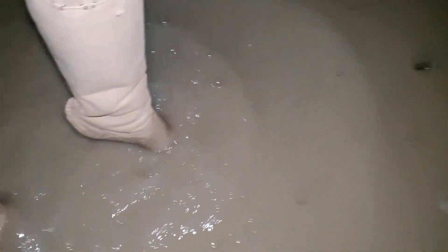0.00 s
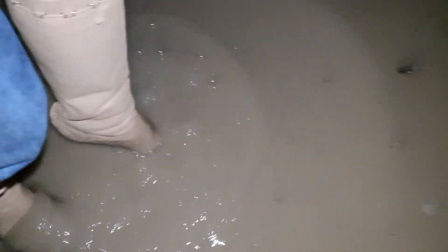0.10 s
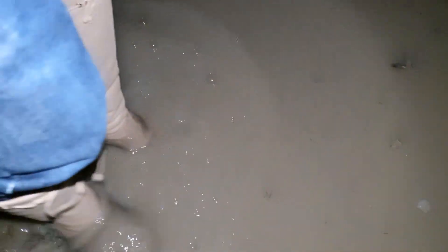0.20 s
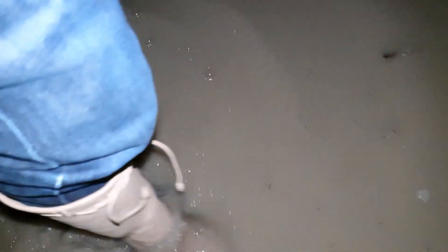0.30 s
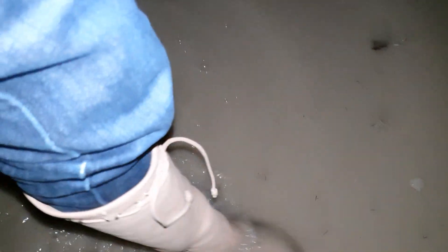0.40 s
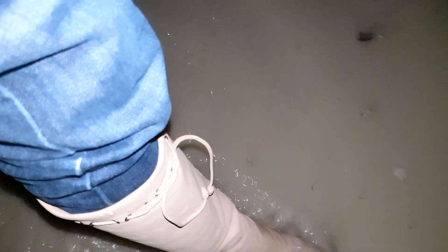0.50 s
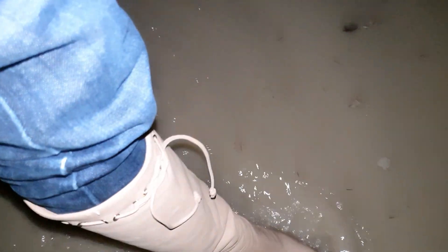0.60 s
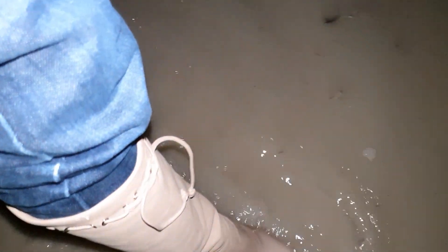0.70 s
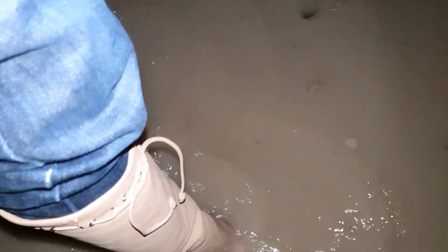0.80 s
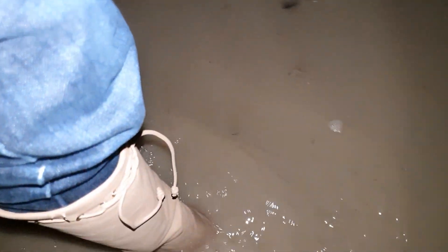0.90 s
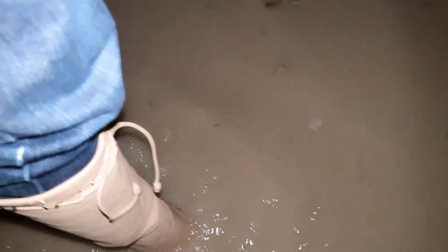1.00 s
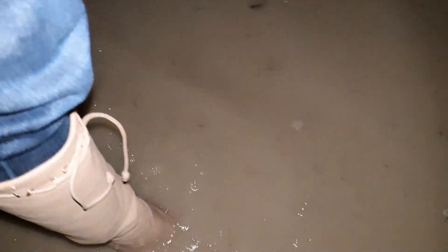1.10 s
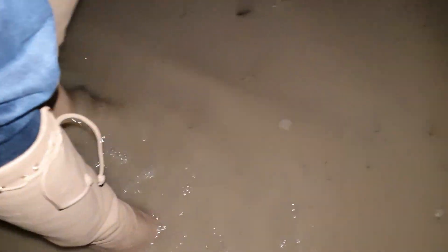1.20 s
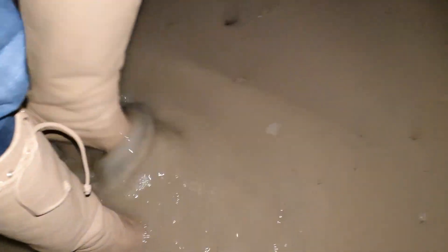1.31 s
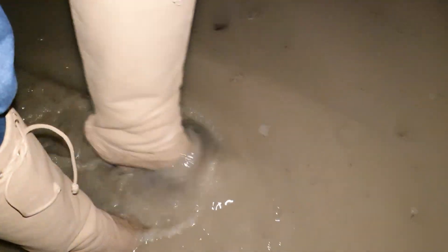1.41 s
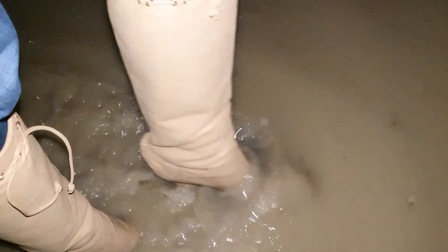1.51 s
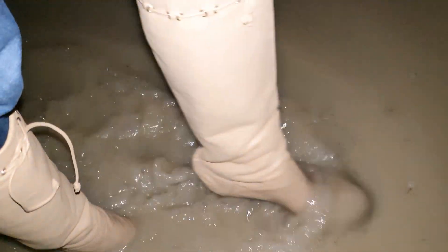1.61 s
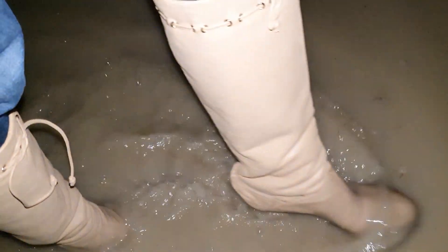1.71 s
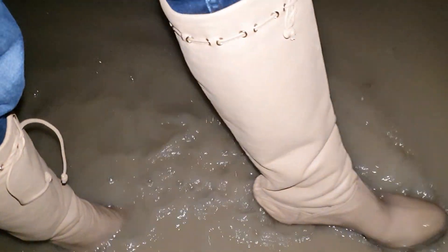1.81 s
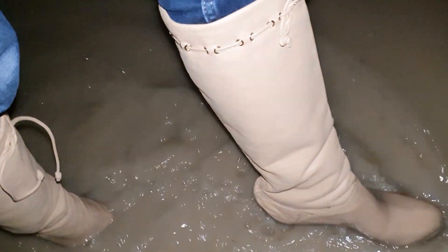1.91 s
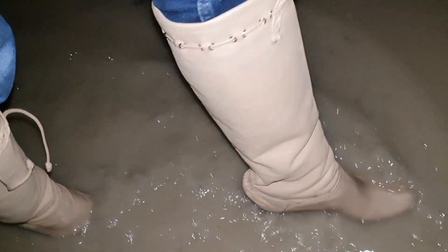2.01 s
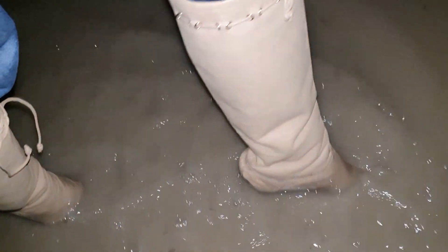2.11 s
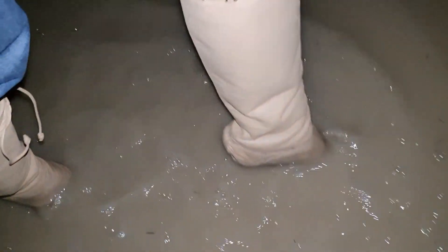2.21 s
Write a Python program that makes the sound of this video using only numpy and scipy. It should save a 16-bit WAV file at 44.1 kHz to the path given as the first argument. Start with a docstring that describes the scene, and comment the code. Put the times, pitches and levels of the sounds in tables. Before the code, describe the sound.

Two slow boot strides slosh through a shallow muddy puddle, the first louder with plops and a quick run of glugs, then drips, a calmer gap, and a softer second slosh; quiet outdoors, close stereo microphone.

```python
"""A shallow muddy puddle outdoors at night: two slow boot strides, heard from close above.
Trapped air rings as short damped sines, mostly gliding up in pitch: the loudest are listed, and a random
swarm of small bubbles follows the stirring. Drops slap the surface as noise cracks over a low push; spray is
flickering treble noise. Shaped noise makes the faint hiss, the swelling low rumble and a late rustle."""
import sys
import numpy as np
from scipy import signal
from scipy.io import wavfile
from scipy.ndimage import uniform_filter1d

SR = 44100
rng = np.random.default_rng(int(sys.argv[2]) if len(sys.argv) > 2 else 0)


def put_to_file(sound):
    """Save the sound as 16-bit audio at rate SR, in the file named by the first command-line argument."""
    columns = np.atleast_2d(sound).T  # one column per channel
    safe = np.clip(columns, -1, 1)
    whole_steps = np.round(safe * 32767)
    wavfile.write(sys.argv[1], SR, whole_steps.astype(np.int16))


N = 101430  # samples, 2.3 s


def amp(db):
    """Decibel law: a level in dB becomes an amplitude factor."""
    return 10 ** (np.asarray(db) / 20)


def evened(x):
    """Normalisation: scale to an RMS of one."""
    return x / np.sqrt(np.mean(x ** 2) + 1e-20)


def read(points, hz):
    """Spectral envelope: interpolate (Hz, value) points along log frequency."""
    f, value = np.transpose(points)
    return np.interp(np.log(hz + 1), np.log(f + 1), value)


def curve(table, t, column):
    """Temporal envelope: interpolate one column of a table whose first column is time."""
    columns = np.transpose(table)
    return np.interp(t, columns[0], columns[column])


def filtered(x, order, hz, kind):
    """Butterworth filtering: a maximally flat pass band."""
    return signal.sosfilt(signal.butter(order, hz, kind, fs=SR, output="sos"), x)


def add(mix, s, sound):
    """Superposition: sum a sound into the mix from s seconds on, cut at the end."""
    part = mix[:, round(s * SR):][:, :sound.shape[1]]
    part += sound[:, :part.shape[1]]


# Likeness of the two ports. Each row: frequency in Hz, left-right correlation from 0 to 1.
PORT_LIKENESS = [(45, 0.6), (300, 0.84), (1500, 0.233), (5000, 0.067)]


def noise(spectrum, size, patch_db, flicker_db):
    """Spectral shaping of partly coherent stereo noise, with local patches and a flicker shared by all bands."""
    hop, hz = size // 4, np.fft.rfftfreq(size, 1 / SR)
    a, b, c, d, p = rng.standard_normal((N // hop + 5, len(hz), 5)).T  # each: bands by frames
    fast = evened(uniform_filter1d(p[0], size=3))
    slow = evened(uniform_filter1d(p[1], size=16))
    flicker = evened(fast + slow).clip(max=2)
    # patches are smooth over neighbouring bands, then over neighbouring frames
    patches = uniform_filter1d(p, size=8, axis=0)
    patches = evened(uniform_filter1d(patches, size=6, axis=1))
    likeness = np.clip(read(PORT_LIKENESS, hz), -1, 1)[:, None]
    right = a + 1j * b
    left = likeness * right + np.sqrt(1 - likeness ** 2) * (c + 1j * d)
    level_db = read(spectrum, hz)[:, None] + patch_db * patches + flicker_db * flicker
    z = np.array([left, right]) * amp(level_db)
    return evened(signal.istft(z, nperseg=size, noverlap=size - hop)[1][:, :N])


# Spectrum of the outdoor air. Each row: frequency in Hz, relative density in dB per Hz.
AIR_SPECTRUM = [(20, -61), (50, 5), (110, -1.5), (300, -15), (1500, -31.5), (6800, -27.5), (7600, -42.5),
                (9500, -33.5), (16000, -45)]
AIR_DB = -56  # RMS level before the rumble swells
# Swell of the rumble. Each row: time in seconds, level in dB that replaces AIR_DB in the lows.
RUMBLE_SWELL = [(0, -59), (1.3, -53), (1.85, -49), (2.1, -57)]


def night_air():
    """Stationary broadband noise is the hiss; its low band, raised and lowered in level, is the rumble."""
    air = noise(AIR_SPECTRUM, size=2048, patch_db=2, flicker_db=0) * amp(AIR_DB)
    low = signal.sosfiltfilt(signal.butter(2, 190, fs=SR, output="sos"), air)
    swell = amp(curve(RUMBLE_SWELL, np.arange(N) / SR, column=1) - AIR_DB)
    return air + low * (swell - 1)  # the air already holds the low band once


# Start and full swell of the rustle, both in seconds.
RUSTLE_SWELL_S = (2.08, 2.3)
RUSTLE_DB, RUSTLE_HZ = -52.5, 3900  # RMS level at full swell, high-pass corner


def rustle():
    """Amplitude modulation: a smooth high hiss, perhaps cloth, rises linearly towards the end."""
    hiss = noise(AIR_SPECTRUM, size=512, patch_db=1, flicker_db=1)
    hiss = evened(filtered(hiss, 4, RUSTLE_HZ, "high"))
    return hiss * amp(RUSTLE_DB) * np.interp(np.arange(N) / SR, RUSTLE_SWELL_S, [0, 1])


# Spectrum of the spray. Each row: frequency in Hz, relative density in dB per Hz.
SPRAY_SPECTRUM = [(2000, -1.5), (6800, -5), (7600, -14.5), (16000, -20.5)]
# How hard the water is stirred; the swarm below follows it too.
# Each row: time in seconds, relative gurgle level in dB, relative treble level in dB.
STIRRING = [(0, -78.5, -93), (.13, -61, -86), (.19, -43, -65), (.3, -40, -54), (.46, -35, -51),
            (.56, -41, -65.5), (.64, -44, -64), (.68, -55, -83), (.84, -55, -73), (1.1, -70, -84),
            (1.24, -53, -80), (1.33, -49, -57), (1.58, -39, -59), (1.78, -52.5, -69.5), (1.87, -44, -69.5),
            (2.01, -50, -80), (2.05, -74, -80.5), (2.3, -57.5, -77.5)]
SPRAY_DB = 16  # added to the treble level
PATCH_DB, FLICKER_DB = 3.5, 5


def spray():
    """Superposed fine droplets merge into noise: a flickering treble that follows the stirring."""
    fizz = noise(SPRAY_SPECTRUM, size=128, patch_db=PATCH_DB, flicker_db=FLICKER_DB)
    level_db = curve(STIRRING, np.arange(N) / SR, column=2) + SPRAY_DB
    return filtered(fizz, 3, 1100, "high") * amp(level_db)


# Drops slapping the surface. Each row: start in seconds, relative level in dB.
DROP_SLAPS = [(.7, -35.5), (0.707, -27.5), (.808, -36), (.828, -31.5), (.877, -31), (1.322, -33),
              (1.789, -30), (1.815, -32), (2.18, -34.5)]
SLAP_MS, SLAP_HZ = 0.94, 5500  # decay time, upper edge of the octave of noise
PUSH_HZ, PUSH_DB = 800, -4  # the push: pitch, level of its sine before decay and drop level


def drops():
    """Impact excitation: a drop lands as a short ragged crack over one low push of the surface."""
    out, t = np.zeros((2, N)), np.arange(400) / SR
    band = signal.butter(2, [SLAP_HZ / 2, SLAP_HZ], "band", fs=SR)
    push = amp(PUSH_DB) * np.sin(2 * np.pi * PUSH_HZ * t) * np.exp(-PUSH_HZ * t)
    for (s, db), grit in zip(DROP_SLAPS, rng.standard_normal((len(DROP_SLAPS), 2, 400))):
        grit = grit + grit[0]  # the ports share part of the grit
        crack = signal.lfilter(*band, grit) * np.exp(-1000 * t / SLAP_MS)
        add(out, s, amp(db) * (crack + push))
    return out


RISE, FALL = 0.7, 0.85  # swelling time in ring times, exponent of the decay
WOBBLE_DB = 2  # RMS of a random ripple in level
GLIDE_OCT_PER_S, LAG_MS = 7, 0.22  # usual glide, longest delay to a port


def bubble(db, hz, ring_ms, glide, lag_s):
    """Damped resonance of an air pocket: fast swell, quick decay, gliding pitch, a small lag to each port."""
    ring = ring_ms / 1000
    t = np.maximum(np.arange(round(7 * ring * SR)) / SR - lag_s[:, None], 0)
    u = t / ring  # time in ring times
    rate = np.log(2) * glide * ring + 1e-4  # never exactly zero, as it divides below
    turns = hz * ring * np.expm1(rate * u) / rate
    shape = (1 - np.exp(-u / RISE)) * np.exp(-u ** FALL)
    shape = shape * (hz * np.exp(rate * u) < .4 * SR)  # silent once the pitch nears the sampling limit
    ripple = evened(uniform_filter1d(rng.standard_normal(t.shape[1]), size=70))
    shape = shape * amp(WOBBLE_DB * ripple)
    return amp(db) * shape / shape.max() * np.sin(2 * np.pi * turns)


# Spectral balance of the small bubbles. Each row: frequency in Hz, level offset in dB.
SWARM_BALANCE = [(330, -4), (600, 8), (3500, 10), (6800, 9), (15000, -1)]
SWARM_DB, SIZE_DB = -11.5, 4.3  # level offset, spread by random size (dB per natural-log unit)
CYCLES = 3.8  # base ring time in cycles, scaled at random by 0.66 to 2.26


def swarm(count):
    """A random point process of small resonating bubbles, as loud as the stirring."""
    out = np.zeros((2, N))
    for when, pitch, size, ring, glide, *place in rng.random((count, 7)):
        pitch = pitch ** .7  # small high bubbles are the most common
        s, hz = when * N / SR, 330 * 45 ** pitch
        # low bubbles follow the gurgle, high ones the treble
        gurgle_db = (1 - pitch ** 2) * curve(STIRRING, s, column=1)
        treble_db = pitch ** 2 * curve(STIRRING, s, column=2)
        size_db = -SIZE_DB * np.log(size + .02)
        db = SWARM_DB + gurgle_db + treble_db + read(SWARM_BALANCE, hz) + size_db
        ring_ms = 1000 * CYCLES * (0.66 + 1.6 * ring ** 2) / hz
        glide_oct_per_s = GLIDE_OCT_PER_S * 4 * glide ** 2
        add(out, s, bubble(db, hz, ring_ms, glide_oct_per_s, np.array(place) * LAG_MS / 1000))
    return out


# Loud bubbles and drips. Each row: start in seconds, peak level in dB, starting pitch in Hz,
# ring time in ms, and glide in octaves per second where it is not the usual one.
LOUD_BUBBLES = [(0.102, -43, 1035, 2.0), (0.149, -24, 1370, 0.98), (0.19, -28.5, 1760, 1),
                (0.251, -22.5, 600, 5.5, 1), (0.293, -17, 2200, 0.39), (0.447, -22.5, 1860, 3.3),
                (0.451, -28, 300, 13, 26), (0.458, -9, 2022, 0.66), (0.465, -22.5, 770, 3.8),
                (0.488, -17.5, 1220, 1.66), (0.503, -30, 500, 8), (0.602, -20, 2045, 1.5, 30),
                (0.578, -31, 620, 3.5), (0.838, -22.5, 3445, 0.44), (0.837, -21, 650, 1.3),
                (0.839, -27, 341, 1.8), (1.133, -38, 567, 1.9), (1.146, -41, 1950, 3.5),
                (1.221, -38, 1400, 2.5), (1.248, -38.5, 5585, 1.2), (1.328, -27.5, 4000, 1.03),
                (1.369, -28.5, 3110, 1.3), (1.395, -25, 1300, 6, -3), (1.447, -28, 1122, 6, 24),
                (1.474, -29, 700, 3), (1.49, -27, 640, 3.5, -30), (1.498, -31, 350, 6),
                (1.566, -24, 1500, 1.2), (1.561, -30.5, 750, 4.2), (1.582, -17.5, 1530, 0.9),
                (1.745, -37, 520, 2), (1.746, -32.5, 1300, 3.3), (1.753, -24, 6220, 0.86),
                (1.844, -36, 350, 14), (1.852, -35, 727, 10, 24), (1.857, -34, 1450, 4),
                (1.886, -38, 400, 12, 14), (1.879, -17.5, 3290, 0.924), (1.948, -29, 540, 7),
                (2.001, -37, 2050, 3), (2.003, -28, 560, 5), (2.008, -33, 850, 5), (2.013, -31.5, 198, 2),
                (2.179, -40, 998, 2.7), (2.262, -42, 220, 5)]
# water glugs shut behind the boot: first start, spacing, peak level, pitch, ring time
GLUG_S, GLUG_GAP_S, GLUG_DB, GLUG_HZ, GLUG_MS = .594, .0097, -29, 600, 1.3


def loud_bubbles():
    """Discrete damped resonances: the bubbles and drips that stand out, and one quick run of glugs."""
    out = np.zeros((2, N))
    glugs = [(GLUG_S + k * GLUG_GAP_S, GLUG_DB, GLUG_HZ, GLUG_MS) for k in range(7)]
    events = list(LOUD_BUBBLES) + glugs
    for (s, db, hz, ring_ms, *own), place in zip(events, rng.random((len(events), 2))):
        glide = own[0] if own else GLIDE_OCT_PER_S
        add(out, s, bubble(db, hz, ring_ms, glide, place * LAG_MS / 1000))
    return out


def scene():
    """Linear superposition of all the sources."""
    return night_air() + rustle() + spray() + drops() + swarm(count=4300) + loud_bubbles()


# Shading of the left port. Each row: frequency in Hz, gain in dB.
LEFT_SHADE = [(100, -1.5), (900, -3), (3000, -6.5), (6500, -14.5), (9000, 1.5), (15000, -5)]
EDGE_HZ = 15900  # upper band limit


def record(dry):
    """Linear filtering: the shaded left port loses some treble, then both ports are band-limited."""
    hz = np.linspace(0, SR / 2, 129)
    shade = signal.firwin2(255, hz, amp(read(LEFT_SHADE, hz)), fs=SR)
    ports = np.array([signal.oaconvolve(dry[0], shade, "same"), dry[1]])
    ports = filtered(ports, 2, 38, "high")
    limit = signal.firwin(511, EDGE_HZ, window=("kaiser", 9), fs=SR)
    return signal.oaconvolve(ports, limit[None], "same")


dry = scene()
out = record(dry)
put_to_file(out)
```